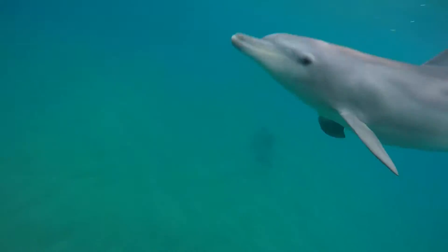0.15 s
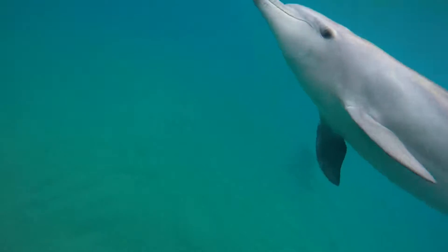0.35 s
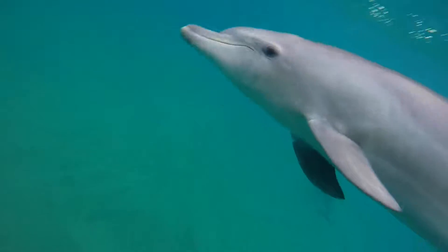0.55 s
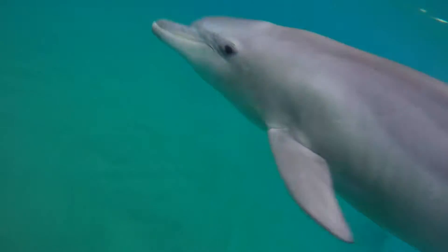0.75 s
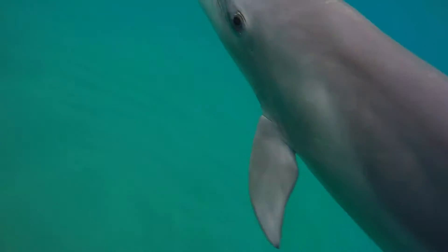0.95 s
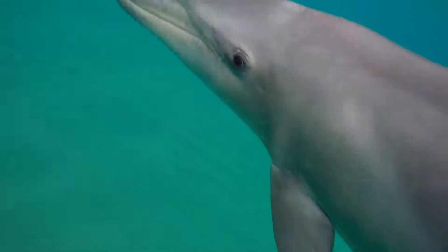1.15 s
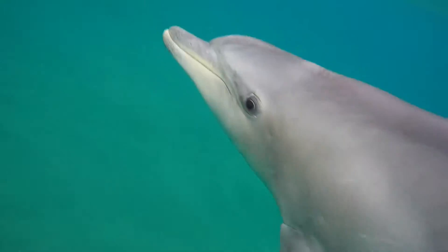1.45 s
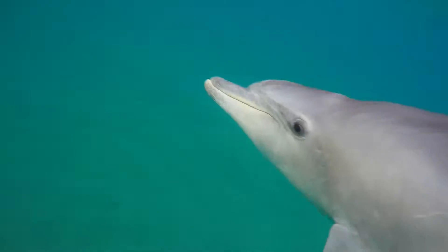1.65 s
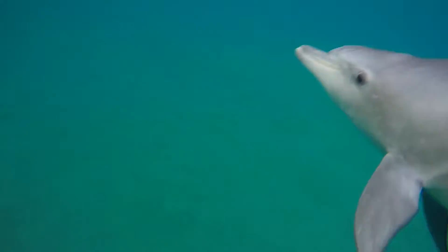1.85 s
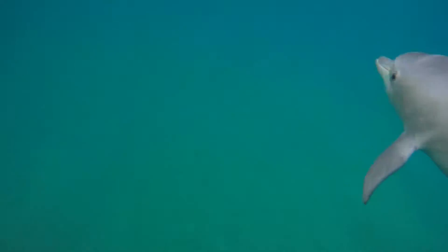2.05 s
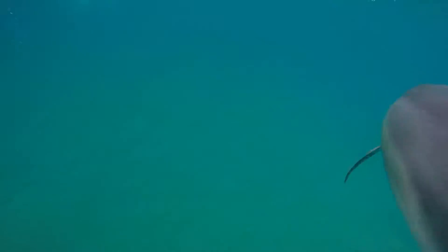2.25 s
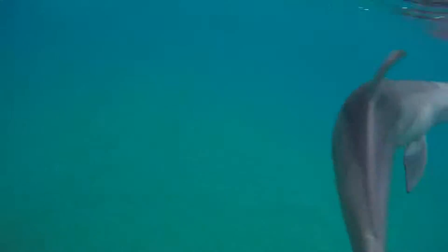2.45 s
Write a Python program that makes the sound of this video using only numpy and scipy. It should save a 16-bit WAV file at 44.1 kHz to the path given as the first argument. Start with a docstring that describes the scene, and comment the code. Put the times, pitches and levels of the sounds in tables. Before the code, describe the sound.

Dolphin clicks underwater: a faint high whistle, a hard rattling burst, then spaced knocking sonar clicks amid bubbles

```python
"""A dolphin swims close past a microphone in a watertight housing, under water in open sea.
Its whistle is a gliding tone with echoes; hard clicks set the housing's decaying modes ringing.
Softer sonar clicks follow, each a band-limited knock with a bright tick; one dry snap falls in the whistle.
Bubbles gurgle and ping as swelling, dying sines, with crackle, fizz and a soft low tone in the wake.
Behind lie the rumble, buffeting and hiss of moving water and the faint wash of the sea, all coloured noise."""
import sys
import numpy as np
from scipy import signal
from scipy.fft import rfft, irfft
from scipy.io import wavfile
from scipy.ndimage import uniform_filter1d

SR = 44100
rng = np.random.default_rng(int(sys.argv[2]) if len(sys.argv) > 2 else 0)


def pcm_store(signal):
    """Save signal as 16-bit PCM."""
    levels = np.round(np.clip(np.atleast_2d(signal), -1, 1) * 32767)
    wavfile.write(sys.argv[1], SR, levels.astype(np.int16).T)


N = 114660
T = np.arange(N) / SR
BRIEF = T[:SR // 4]  # time base of one short sound
CUTOFF_HZ = 16500  # top of the microphone's range


def from_db(db):
    """Decibels to gain."""
    return 10 ** (np.asarray(db) / 20)


def rms_one(x):
    """Scale to unit rms."""
    return x / np.sqrt(np.mean(x ** 2) + 1e-20)


def in_time(rows):
    """Each column of a curve, joined by straight lines."""
    s, *columns = np.transpose(rows)
    return [np.interp(T, s, c) for c in columns]


def add(out, s, sound):
    """Mix a sound in at time s."""
    i = int(s * SR)
    out[i:i + len(sound)] += sound[:N - i]


def butterworth(x, order, hz, kind):
    """Filter a sound with a Butterworth slope."""
    return signal.sosfilt(signal.butter(order, hz, kind, fs=SR, output="sos"), x)


def drift(rate_hz):
    """Slow chance of spread 1: twice-smoothed noise, drawn every 40 samples and joined by lines."""
    step = 40
    r = np.exp(-2 * np.pi * rate_hz * step / SR)
    settle = 2000  # first draws, dropped while the smoothing settles
    draws = rng.standard_normal(N // step + 2 + settle)
    slow = rms_one(signal.lfilter([1], [1, -2 * r, r * r], draws)[settle:])
    return np.interp(np.arange(N) / step, np.arange(len(slow)), slow)


def noise(spectrum):
    """Unit-rms noise of a given colour, its spectrum drawn over log frequency."""
    hz, db = np.transpose(spectrum)
    bins_hz = np.fft.rfftfreq(N, 1 / SR)
    colour = from_db(np.interp(np.log(bins_hz + 1), np.log(hz), db))
    colour[0] = 0  # no constant offset
    return rms_one(irfft(rfft(rng.standard_normal(N)) * colour, N))


def tail(x, t60):
    """A diffuse echo: decaying noise of unit energy, convolved with the sound."""
    echoes = rng.standard_normal(SR) * np.exp(-np.log(1000) * T[:SR] / t60)
    return signal.fftconvolve(x, echoes / np.linalg.norm(echoes))[:N]


def whistle():
    """A nearly pure tone arches up and down; its octave shows while it is low."""
    # The whistle's central pitch: (time [s], pitch [Hz])
    pitch_curve = [(.26, 6380), (.302, 6760), (.37, 10100), (.43, 12000), (.452, 13500), (.545, 15350),
                   (.578, 14800), (.612, 14000), (.652, 13000), (.675, 11070), (.778, 8120), (.802, 7450),
                   (.83, 7860)]
    # The whistle's loudness before flutter: (time [s], level [dB])
    level_curve = [(.255, -63), (.275, -57.5), (.37, -53.5), (.425, -61), (.47, -49), (.53, -63),
                   (.63, -63), (.68, -53), (.745, -58), (.77, -68), (.79, -62), (.835, -69)]
    waver, flutter_db, octave_db = 0.0059, 4.5, -9  # waver is a fraction of the pitch
    hz, = in_time(pitch_curve)
    db, = in_time(level_curve)
    phase = 2 * np.pi * np.cumsum(hz * (1 + waver * drift(150))) / SR
    octave_fade = np.clip((CUTOFF_HZ - 2 * hz) / 2000, 0, 1)  # gone where it would pass the cutoff
    tone = np.sin(phase) + from_db(octave_db) * octave_fade * np.sin(2 * phase)
    sounding = (T > level_curve[0][0]) & (T < level_curve[-1][0])
    return np.sqrt(2) * tone * sounding * from_db(db + flutter_db * drift(46))


def whistle_paths(call):
    """The whistle arrives direct and by diffuse echoes; its top lingers longest."""
    bounce = from_db(-11) * tail(call, 0.056)
    top = butterworth(call, 6, 13500, "high")
    return call + bounce + from_db(-10) * tail(top, 1.3)


def struck(modes, tilt_db=0, stretch=1, pitch=1, hold_s=0):
    """Modes of alternating sign and slightly chance strength hold, then die; tilted about the strongest."""
    centre_hz = max(modes, key=lambda m: m[1])[0]
    age = np.maximum(BRIEF / stretch - hold_s, 0)
    out = np.zeros(len(BRIEF))
    for k, (hz, db, t60) in enumerate(modes):
        chance_db = rng.uniform(-0.57, 0.5)
        gain = (-1) ** k * from_db(db + tilt_db * np.log2(hz / centre_hz) + chance_db)
        decay = np.exp(-np.log(1000) * age / t60)
        out += gain * decay * np.sin(2 * np.pi * hz * pitch * BRIEF)
    return out


def crack(decay_s, low_hz, high_hz):
    """The very short edge of a click: a band of noise given the energy of its envelope."""
    envelope = np.exp(-BRIEF / decay_s) * (1 - np.exp(-4 * BRIEF / decay_s))
    burst = butterworth(rng.standard_normal(len(BRIEF)) * envelope, 2, [low_hz, high_hz + 1], "band")
    return burst * np.linalg.norm(envelope) / np.linalg.norm(burst)


def hard_clicks():
    """Clicks aimed at the housing crack and make it ring, the strongest into saturation."""
    # Clicks at the housing: (time [s], ring level before tilt [dB], brightness [dB per octave],
    # ring length [factor], ring pitch [factor], crack level before dulling [dB], crack's upper edge [Hz])
    click_rows = [(.9662, -27, 11, .6, 0.68, -20, 15000), (.9718, -18, 1, 0.47, 1.39, -18, 10000),
                  (0.9763, -20.5, -6, 1.7, 1, -15, 8540), (0.9832, -15, 14.5, 0.44, 0.83, -12.5, 9400),
                  (.9902, -8, -3, 0.64, 1.04, -14, 7000), (.9925, -15, 7, 1.1, 0.955, -22, 6500),
                  (0.9963, -14.5, -3.5, 2.1, .99, -9.5, 9400),
                  (1.0038, -19.5, 11, 0.89, 1.056, -10.5, 9500),
                  (1.0158, -21.5, -4.5, 1.18, 1.01, -15, 9600), (1.0998, -5, 1.5, 1.03, 1.02, -5.5, 6500),
                  (1.1636, -8.5, -2, 1.4, 0.97, -17, 6000), (1.172, -10.5, -2, 1.04, 1.05, -16, 5900),
                  (1.1868, -13, -1.5, 1.34, 0.95, -45, 6000)]
    # The housing's modes at factor 1: (pitch [Hz], relative level [dB], decay by 60 dB [s])
    housing_modes = [(986, -11.5, 0.019), (1194, -11, 0.019), (1368, -12.5, 0.01), (1900, -16.5, 0.011),
                     (2755, -2.5, 0.012), (2970, -3.5, 0.0089), (3350, -27, 0.021), (4100, -16, .009),
                     (4400, -20.5, 0.011), (5140, -15, 0.0058), (6500, -21, 0.0044), (7130, -32.5, 0.0049)]
    hold_s = 0.00097  # at ring length 1
    limit = 0.71  # amplitude at which the ring saturates
    rings, cracks = np.zeros(N), np.zeros(N)
    for s, db, tilt_db, stretch, pitch, crack_db, edge_hz in click_rows:
        add(rings, s, from_db(db) * struck(housing_modes, tilt_db, stretch, pitch, hold_s))
        dulled = butterworth(crack(0.00043, 3440, edge_hz), 1, edge_hz, "low")
        add(cracks, s, from_db(crack_db) * dulled)
    rings = limit * np.tanh(rings / limit)
    return cracks + butterworth(rings, 3, 9600, "low")


def sonar_train():
    """Each click is a bright tick and a short knock, confined to a band whose steep lower edge rings on."""
    # Sonar clicks: (time [s], knock level [dB], tick level [dB])
    sonar_rows = [(1.2308, -20.5, -33), (1.3019, -15.5, -28), (1.3907, -10.5, -27), (1.487, -10.5, -27.5),
                  (1.5766, -13.5, -30.5), (1.634, -14, -31.5), (1.6768, -14.5, -30.5),
                  (1.716, -14.5, -29.5), (1.7516, -14.5, -31), (1.788, -15.5, -35), (1.8268, -17, -35),
                  (1.8751, -19, -31.5), (1.9484, -24, -38)]
    low_hz, high_hz, tick_low_hz, tick_high_hz = 1570, 2720, 7400, 15400
    tick_decay_s, edge_db = 0.00047, -24  # edge relative to the knock
    pulse = 1.0 * (BRIEF == 0)
    knock = signal.sosfilt(signal.ellip(5, .4, 38, low_hz, "high", fs=SR, output="sos"), pulse)
    knock = butterworth(knock, 11, high_hz, "low")
    knock = knock / np.abs(knock).max()
    out = np.zeros(N)
    for s, db, tick_db in sonar_rows:
        edge = from_db(edge_db) * crack(tick_decay_s, high_hz, tick_low_hz)
        tick = from_db(tick_db) * crack(tick_decay_s, tick_low_hz, tick_high_hz)
        add(out, s, from_db(db) * (knock + edge) + tick)
    return out


def snap():
    """One dry snap during the whistle: a cluster of modes struck once."""
    # The snap: (time [s], level [dB])
    snap_at = (.6704, -12.5)
    # Its modes: (pitch [Hz], relative level [dB], decay by 60 dB [s])
    snap_modes = [(984, -15.5, 0.021), (2020, 2, 0.0091), (2370, 5, 0.0052), (3150, 1.5, 0.0096),
                  (4050, -6, 0.022), (4730, -7.5, 0.012), (6240, -12, 0.0051), (7240, -15, 0.003)]
    out = np.zeros(N)
    add(out, snap_at[0], from_db(snap_at[1]) * struck(snap_modes))
    return out


def bubble(hz, t60):
    """A bubble swells in a cycle or two and dies away, rising in pitch."""
    swell_cycles, rise = 1.67, 0.045
    t = BRIEF[:int(1.5 * t60 * SR)]
    swell = 1 - np.exp(-(t * hz / swell_cycles) ** 2)
    envelope = swell * np.exp(-np.log(1000) * t / t60)
    return envelope / envelope.max() * np.sin(2 * np.pi * hz * t * (1 + rise * t / t60))


def bubbles():
    """Distinct bubbles stand out of a steady gurgle of small random ones."""
    # Single bubbles: (time [s], starting pitch [Hz], level [dB], decay by 60 dB [s])
    near_rows = [(.075, 650, -28, 0.041), (.233, 603, -29, 0.037), (.343, 580, -28, 0.017),
                 (.426, 631, -27, 0.029), (.479, 653, -27.5, 0.035), (.5, 576, -24.5, 0.032),
                 (.636, 595, -22, 0.048), (.858, 571, -24.5, .12), (1.53, 571, -24, 0.21),
                 (1.592, 598, -20.5, 0.12), (1.87, 861, -36, 0.14), (1.925, 585.6, -27.5, .12),
                 (2.093, 688, -26, 0.079), (2.272, 669, -26.5, 0.091), (2.394, 661.6, -23.5, .06),
                 (2.543, 515, -23, 0.034), (1.448, 2720, -35, 0.015), (1.483, 2670, -30, .01),
                 (1.619, 2340, -31, 0.024), (1.783, 3820, -29.5, 0.011), (1.812, 4180, -37.5, 0.015),
                 (1.8225, 3520, -30.5, 0.025), (1.824, 4250, -38, 0.01), (1.843, 2510, -38, 0.047),
                 (2.123, 1800, -31.5, 0.034), (2.1297, 4400, -32, 0.01), (2.1418, 5250, -30.5, 0.009),
                 (2.144, 3150, -34.5, 0.027), (2.397, 2500, -39.5, 0.017)]
    gurgles_per_s, gurgle_hz, spread_oct, decay_cycles, gurgle_db = 260, 580, 0.22, 29, -43
    near, crowd = np.zeros(N), np.zeros(N)
    for s, hz, db, t60 in near_rows:
        add(near, s, from_db(db) * bubble(hz, t60))
    for when, a, b, size in rng.random((int(gurgles_per_s * N / SR), 4)):
        hz = gurgle_hz * 2 ** (2 * spread_oct * (a - b))
        add(crowd, when * N / SR, from_db(12.8 * size) * bubble(hz, decay_cycles / hz))
    return near + from_db(gurgle_db) * rms_one(crowd)


def crackle():
    """Tiny bubbles crack and fizz in the wake: short noise bursts and a scatter of high bubbles."""
    # Faint crackles: (time [s], level [dB])
    crackle_rows = [(1.121, -59), (1.351, -45.5), (1.782, -36), (1.8233, -32), (2.106, -46), (2.124, -44),
                    (2.1297, -46), (2.138, -57), (2.14, -34.5), (2.146, -48), (2.16, -35.5), (2.168, -42),
                    (2.399, -54)]
    fizz_per_s, fizz_hz, fizz_db = 40, 3200, -58
    centre_s, spread_s = 1.65, .3  # when the fizz gathers
    out = np.zeros(N)
    for s, db in crackle_rows:
        add(out, s, from_db(db) * crack(0.00067, 1800, 10500))
    for when, pitch, size in rng.standard_normal((int(fizz_per_s * N / SR), 3)):
        hz = min(fizz_hz * 2 ** (.5 * pitch), CUTOFF_HZ)
        s = (centre_s + spread_s * when) % T[-1]
        add(out, s, from_db(fizz_db + 4.6 * size) * bubble(hz, 30 / hz))
    return out


def low_tone():
    """A soft low sine wavers in the dolphin's wake."""
    # The tone: (time [s], pitch [Hz], level before a slight flutter [dB])
    tone_curve = [(1.53, 324, -63), (1.588, 307.5, -32.5), (1.63, 275.7, -37), (1.72, 308.3, -46),
                  (1.79, 301.6, -46), (1.85, 282, -49.5), (1.94, 321, -44.5), (2.03, 304.6, -75),
                  (2.22, 268, -62.5), (2.3, 315, -50), (2.37, 358, -62)]
    hz, db = in_time(tone_curve)
    sounding = (T > tone_curve[0][0]) & (T < tone_curve[-1][0])
    tone = np.sin(2 * np.pi * np.cumsum(hz) / SR)
    return np.sqrt(2) * sounding * from_db(db + 1.1 * drift(13)) * tone


def water():
    """Flow rumbles, buffets and hisses as the dolphin passes, over the steady wash of the sea."""
    # Flow past the housing: (time [s], relative rumble level [dB], relative hiss level [dB])
    flow_curve = [(0, -19, -65), (.18, -31.5, -59.5), (.28, -19, -56), (.56, -19.5, -57), (.76, -10, -52),
                  (.92, -14.5, -46.5), (1.1, -13.5, -44.5), (1.35, -13.5, -47.5), (1.62, -16, -52.5),
                  (1.85, -23, -61), (2.05, -24, -74), (2.35, -30.5, -66), (2.6, -25.5, -80)]
    # Buffeting around 130 Hz: (time [s], level [dB])
    buffet_curve = [(0, -43), (.5, -38.5), (.75, -33.5), (1, -26.5), (1.2, -29), (1.45, -30), (1.7, -35),
                    (2, -49), (2.2, -50.5), (2.6, -60)]
    # Low wash around 400 Hz: (time [s], level [dB])
    wash_curve = [(0, -64), (.7, -56.5), (.95, -43.5), (1.22, -44), (1.4, -52.5), (1.55, -39), (1.8, -50),
                  (1.95, -38), (2.08, -45.5), (2.2, -51.5), (2.6, -60)]
    # Thin hiss near 4 kHz: (time [s], level [dB])
    thin_curve = [(0, -64.5), (.4, -66), (.8, -78.5), (2.6, -74)]
    # Colours of the six noises: (frequency [Hz], relative density [dB per Hz])
    rumble_colour = [(15, -8), (29, 5.5), (42, -1), (62, -7.5), (100, -25.5), (180, -30.5), (260, -44.5),
                     (450, -52.5), (800, -48), (1500, -84)]
    buffet_colour = [(45, -6), (95, 4), (135, -5), (185, -5), (250, -17), (450, -31), (900, -70)]
    wash_colour = [(170, -21), (280, -6.5), (400, 0.5), (500, 0.5), (750, -16), (1200, -48)]
    hiss_colour = [(300, 7), (700, 0.5), (1100, -1), (1600, -3), (2400, -10.5), (3300, -10), (4500, -28),
                   (8000, -48), (16000, -60)]
    thin_colour = [(1200, -14), (2500, -2), (3100, -8.5), (3900, 1), (4500, -7), (5500, -27), (12000, -42)]
    sea_colour = [(100, -10.5), (280, -5.5), (430, 1.5), (600, 16), (760, -7.5), (950, -3.5), (1300, -17.5),
                  (2600, -12.5), (4200, -19.5), (5500, -19.5), (9000, -26.5), (14500, -28), (17000, -34)]
    rumble_db, hiss_db = in_time(flow_curve)
    rumble = noise(rumble_colour)
    rumble = rumble / np.sqrt(uniform_filter1d(rumble ** 2, size=SR // 8))  # even out its chance swells
    rumble = from_db(rumble_db - 3.5) * rumble
    buffet = from_db(in_time(buffet_curve)[0]) * noise(buffet_colour)
    wash = from_db(in_time(wash_curve)[0]) * noise(wash_colour)
    hiss = from_db(hiss_db + 0.5 + drift(6.2)) * noise(hiss_colour)
    thin = from_db(in_time(thin_curve)[0]) * noise(thin_colour)
    sea = from_db(-50.5) * noise(sea_colour)
    return rumble + buffet + wash + hiss + thin + sea


def scene():
    """Dolphin, bubbles and water at one microphone; all clicks scatter a faint short echo."""
    call = whistle_paths(whistle())
    clicks = hard_clicks() + sonar_train() + snap()
    clicks = clicks + from_db(-22) * tail(clicks, .05)
    return (call + clicks + bubbles() + crackle() + low_tone() + water())[None]


def record(dry):
    """The microphone's top is cut steeply, just below the cutoff."""
    return signal.sosfilt(signal.ellip(10, .2, 80, CUTOFF_HZ - 400, fs=SR, output="sos"), dry)


dry = scene()
out = record(dry)
pcm_store(out)
```